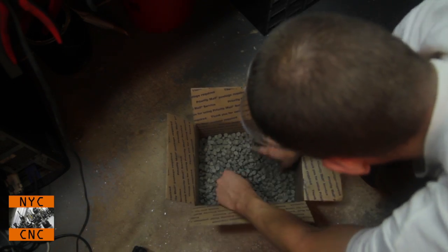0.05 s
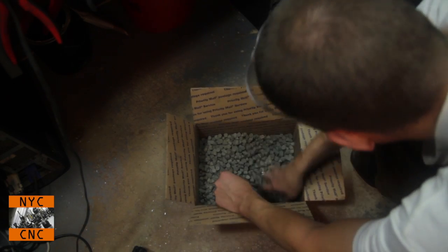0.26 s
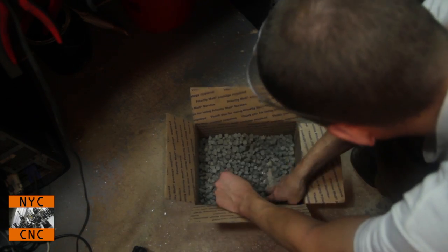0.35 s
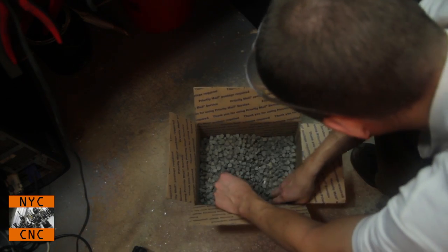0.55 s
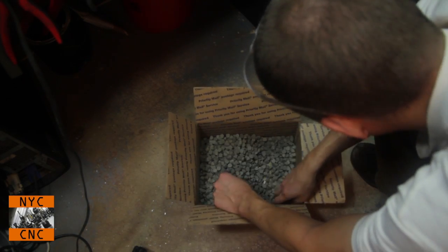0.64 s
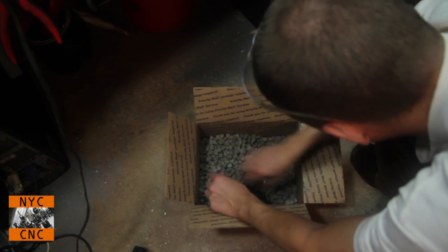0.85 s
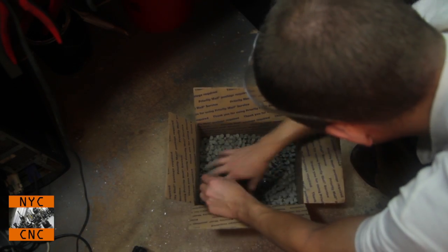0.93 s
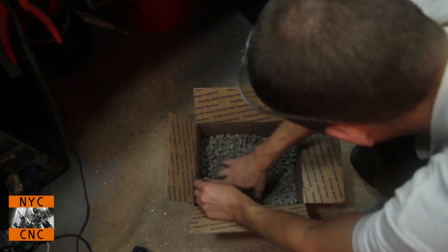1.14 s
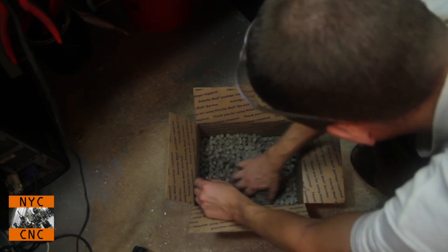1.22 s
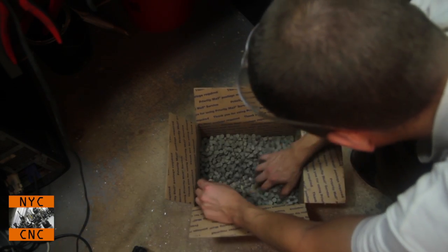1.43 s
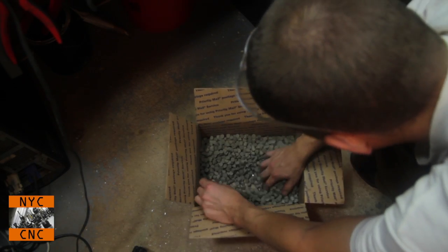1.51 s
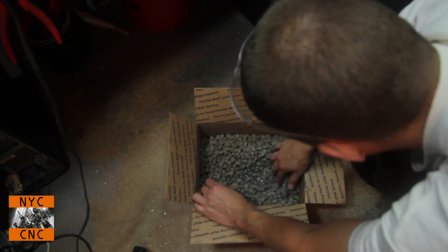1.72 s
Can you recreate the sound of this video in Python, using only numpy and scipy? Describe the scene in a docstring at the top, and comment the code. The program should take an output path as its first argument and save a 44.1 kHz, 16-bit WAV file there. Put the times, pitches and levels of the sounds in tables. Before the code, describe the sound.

Hands dig through a heap of small hard pellets in a cardboard box: a bright rattling rush with hollow knocks, a quieter lull, then another surge; close microphone in a workshop with slight echo.

```python
"""Hands digging through a box of metal pellets

Thousands of small pellets in a cardboard box tick in a bright hiss: random clicks exciting short rings.
The shifting heap clacks and drums on the cardboard, whose resonant modes answer with short hollow knocks.
Each knock also rattles pellets. A workshop adds echo and room tone; one close microphone feeds both channels."""
import sys
import numpy as np
from scipy import signal
from scipy.fft import rfft, irfft, next_fast_len
from scipy.io import wavfile

SR = 44100
rng = np.random.default_rng(int(sys.argv[2]) if len(sys.argv) > 2 else 0)


def persist_wave(psi):
    """Save psi, clipped to +-1, as 16-bit WAV."""
    counts = np.round(np.clip(psi, -1, 1) * 32767).astype(np.int16)
    wavfile.write(sys.argv[1], SR, np.atleast_2d(counts).T)


N = 77175


def amp(db):
    """Decibels to linear gain."""
    return 10 ** (np.asarray(db) / 20)


def rms_one(x):
    """Scale to rms 1."""
    return x / np.sqrt(np.mean(x ** 2) + 1e-20)


def in_time(rows):
    """Interpolate table columns at every sample; the first column is t/s."""
    s, *columns = np.transpose(rows)
    return [np.interp(np.arange(N) / SR, s, c) for c in columns]


def at_hz(points, hz):
    """Interpolate a spectrum in dB on a log frequency axis."""
    points_hz, points_db = np.array(points).T
    return np.interp(np.log(hz), np.log(points_hz), points_db)


def ring(clicks, hz, t60_s):
    """Two-pole resonator: a unit click starts a decaying sine of initial height 1."""
    r = amp(-60 / (t60_s * SR))
    w = 2 * np.pi * hz / SR
    return signal.lfilter([0, np.sin(w)], [1, -2 * r * np.cos(w), r * r], clicks + 1e-18)


def contacts(per_s, spread_db):
    """Random impacts: clicks of uneven size and either sign."""
    excess_db = spread_db * np.minimum(rng.exponential(1, N), 5)
    sizes = amp(excess_db) * rng.choice([-1, 1], N)
    return sizes * (rng.random(N) < per_s / SR)


def grains(per_s, spread_db, t60_cycles, colour, count=24):
    """Impacts of small hard bodies: clicks dealt at random to short rings across the colour's range; rms 1."""
    clicks = contacts(per_s, spread_db)
    dealt = rng.integers(0, count, N)
    out = 0
    for k, hz in enumerate(np.geomspace(colour[0][0], colour[-1][0], count)):
        gain = amp(at_hz(colour, hz)) * hz  # hz offsets band spacing and ring length: colour is per Hz
        out = out + gain * ring(clicks * (dealt == k), hz, t60_cycles / hz)
    return rms_one(out)


def noise(colour, level_db):
    """Steady Gaussian noise shaped by a spectrum."""
    hz = np.maximum(np.arange(N // 2 + 1) * SR / N, 1)
    spectrum = rfft(rng.standard_normal(N)) * amp(at_hz(colour, hz))
    return amp(level_db) * rms_one(irfft(spectrum, N))


def drift(corner_hz):
    """Slow random fluctuation: noise through two equal low-pass poles; rms 1."""
    r = np.exp(-2 * np.pi * corner_hz / SR)
    slow = signal.lfilter([1], [1, -2 * r, r * r], rng.standard_normal(N + 4000))
    return rms_one(slow[4000:])  # drop filter start-up


# stirring of the pellets: t/s, tick level/dB, clack level relative to ticks/dB
STIRRING = [(0.0, -42.5, 1), (0.028, -46, 6.5), (0.042, -39, 0.5), (0.106, -46, 0.5), (0.144, -34, -8.5),
            (0.184, -40, -16.5), (0.204, -31, -5), (0.3, -30.5, -4), (0.324, -30.5, 3.5), (0.34, -27, -6.5),
            (0.364, -25, 4), (0.49, -45.5, -1.5), (0.532, -43.5, 3.5), (0.596, -53, 0.2), (0.66, -45, -4),
            (0.762, -51.5, -1.5), (0.786, -42.5, -4), (0.816, -46, -8.5), (0.884, -45.5, -13),
            (0.96, -56, -4.5), (1.014, -57, -16.5), (1.026, -38, 8), (1.048, -34, 6), (1.088, -50.5, 9),
            (1.116, -41.5, -2.5), (1.214, -29.5, 4.5), (1.27, -29.5, -4), (1.42, -33.5, -1.5),
            (1.582, -41, -3), (1.745, -43, 3.5)]
# spectrum of the fine ticks: f/Hz, density/(dB per Hz)
TICK_COLOUR = [(2350, 4.5), (4000, -4), (6490, -3), (6920, -1.5), (8390, 3.5), (10300, 4), (13400, -0.5),
               (15600, -31.5)]
# spectrum of the heavier clacks: f/Hz, density/(dB per Hz)
CLACK_COLOUR = [(710, -2), (1200, -0.5), (1470, -11.5), (1810, 5.5), (2360, -8), (4500, -10.5), (5850, -80),
                (9900, -120)]
TICKS_PER_S, TICK_SPREAD_DB, TICK_T60_CYCLES = 36000, 2.0, 13.95
CLACKS_PER_S, CLACK_SPREAD_DB, CLACK_T60_CYCLES = 7000, 2, 5.67
CLUMP_RMS_DB, CLUMP_CORNER_HZ = 1.1, 35.0


def pellets():
    """Pellets slide in small uneven avalanches: dense ticks and coarser clacks follow the stirring."""
    level_db, clack_db = in_time(STIRRING)
    ticks = grains(TICKS_PER_S, TICK_SPREAD_DB, TICK_T60_CYCLES, TICK_COLOUR)
    clacks = grains(CLACKS_PER_S, CLACK_SPREAD_DB, CLACK_T60_CYCLES, CLACK_COLOUR)
    clump_db = CLUMP_RMS_DB * drift(CLUMP_CORNER_HZ)
    return amp(level_db + clump_db) * (ticks + amp(clack_db) * clacks)


REACH_OCT, FAR_DB = 0.473, -11  # Gaussian width of a blow's reach; floor for far modes


def reach(hz, centre_hz):
    """A blow excites modes near its centre most, the far ones down to a floor."""
    octaves = np.log2(hz / centre_hz)
    return amp(FAR_DB) + np.exp(-.5 * (octaves / REACH_OCT) ** 2)


# heap pressing on the cardboard: t/s, level/dB, centre of ringing walls f/Hz, bottom-panel weight/dB
DRUMMING = [(0.0, -32, 462, -7), (0.028, -38, 520, -3), (0.072, -33, 585.5, -4), (0.102, -49.5, 690, -19),
            (0.14, -35, 717, -7.5), (0.188, -35.5, 445, -17.5), (0.212, -38, 413, -4.5),
            (0.28, -32, 542, -6), (0.314, -32.5, 457, -4.5), (0.358, -22, 700, 1.5), (0.46, -37, 740, -20),
            (0.528, -38.5, 447, -18), (0.544, -46.5, 450, -16.5), (0.602, -46.5, 690, -24.5),
            (0.66, -43, 572, -19), (0.704, -44.5, 674, -21.5), (0.766, -38, 577, -16), (0.8, -35, 700, -16),
            (0.868, -41.5, 730, -16.5), (0.908, -42.5, 740, -4.5), (0.956, -57, 500, -15),
            (1.02, -54, 345, -12), (1.032, -30.5, 560, 4), (1.068, -34, 440, 1.5),
            (1.112, -36.5, 390, -9.5), (1.194, -30, 494, -5.5), (1.232, -25, 518, -7),
            (1.276, -29.5, 400, -1.5), (1.32, -26.5, 500, -17), (1.412, -22, 740, -27),
            (1.465, -29, 460, -18), (1.51, -37, 500, -13.5), (1.564, -34.5, 422, -13),
            (1.602, -42.5, 518, -22.5), (1.646, -35.5, 390, -10.5), (1.674, -38, 379, -17.5),
            (1.718, -37, 424, -14), (1.745, -32.5, 420, -9.5)]
# cardboard box modes: f/Hz, relative level/dB, t60/s
BOX_MODES = [(65, -4, 0.064), (103.4, -2.5, 0.05), (221, -23, 0.045), (271.43, -3, 0.203), (330, 7, 0.0258),
             (410.7, -1.5, 0.041), (539.25, 2, 0.0516), (606, -3.5, 0.0318), (700, 3, 0.0188),
             (780, -4, 0.0333), (905, 4.5, 0.0365), (1010, 1.5, 0.0396), (1210.8, 8.5, 0.0359),
             (1459.4, 0.5, 0.05), (1681, 1.5, 0.0364), (1800, 3, 0.047), (2190, 0, 0.0142)]
DRUM_PER_S, DRUM_SPREAD_DB = 1500, 1
BOTTOM_HZ, BOTTOM_DB = 230, 8  # modes below this are the bottom panel; gain on its weight


def drumming():
    """Many small blows on the cardboard, each ringing the modes in its own random mix."""
    level_db, centre_hz, bottom_db = in_time(DRUMMING)
    blows = contacts(DRUM_PER_S, DRUM_SPREAD_DB)
    power = sum(amp(2 * db) * t60_s * reach(hz, centre_hz) ** 2 for hz, db, t60_s in BOX_MODES)
    out = 0
    for hz, db, t60_s in BOX_MODES:
        if hz < BOTTOM_HZ:
            share = amp(BOTTOM_DB + bottom_db) * np.sqrt(power.mean())
        else:
            share = reach(hz, centre_hz)
        gain = amp(db) * share / np.sqrt(power)  # evens out loudness as the centre moves
        out = out + ring(blows * rng.standard_normal(N) * gain, hz, t60_s)
    return amp(level_db) * rms_one(out)


# single knocks on the box: t/s, swing envelope peak/dB, f/Hz, time to peak/ms
KNOCKS_ON_BOX = [(.033, -26, 950, 2.1), (.06, -26.5, 404.7, 2.17), (.083, -32, 923, 2.75),
                 (.137, -33.5, 1051, 5.3), (.222, -28, 385, 4.1), (.324, -18, 318, 1.56),
                 (.331, -15.5, 413, 1.48), (.337, -16.5, 330, 1.78), (.357, -19.5, 625.4, 4.1),
                 (.364, -15.5, 223.5, 2.69), (.3645, -11, 720, 1.3), (.3682, -6, 700, 1.8),
                 (.378, -15, 578, 1.88), (.389, -16, 720, 3.34), (.457, -27, 750, 1.6),
                 (.484, -29, 750, 1.3), (.526, -31, 380, 3.3), (.603, -33, 1400, .6),
                 (.716, -33, 700, 1.55), (.7255, -23, 700, 1.64), (.7435, -23.5, 700, 0.84),
                 (.749, -30, 430, 3.1), (.777, -22.5, 620, 2.2), (.792, -30, 800, 4.1), (.832, -32, 750, 2),
                 (.87, -28, 818, 1.29), (.976, -46, 780, 3.1), (1.0245, -17, 360, 2.2),
                 (1.042, -23, 1800, 2.5), (1.044, -25, 820, 2.5), (1.127, -23, 450, 1.2),
                 (1.197, -22, 1800, 2.5), (1.197, -24, 457, 2.6), (1.24, -20, 680, 2),
                 (1.371, -15, 780, 1.1), (1.39, -22, 481, 1.1), (1.405, -18, 412, 3.2),
                 (1.41, -19.5, 913, 3.3), (1.438, -17, 412, 6.06), (1.465, -24, 564, 2.57),
                 (1.51, -28.5, 514, 2.24), (1.559, -31.5, 397.7, 5.5), (1.6495, -21.5, 375, 3.1),
                 (1.655, -28, 950, 2.2), (1.668, -28, 401, 2.5), (1.7465, -23, 320, 1.2)]
RING_DB, TAP_DB = -24, -21  # drive of the modes by the swing; hard tap re knock peak


def knocks():
    """The loaded panel swings a few cycles at its own pitch; this and a hard tap ring the box modes."""
    t = np.arange(2000) / SR
    swing, taps = np.zeros(N + len(t)), np.zeros(N)
    for s, peak_db, pitch_hz, rise_ms in KNOCKS_ON_BOX:
        i = int(s * SR)
        u = t / (np.clip(rise_ms, .5, 8) / 1000)
        envelope = u * np.exp(1 - u)  # peaks at 1 when u = 1
        swing[i:i + len(t)] += amp(peak_db) * envelope * np.sin(2 * np.pi * pitch_hz * t)
        taps[i] = amp(peak_db + TAP_DB)
    swing = swing[:N]
    box = 0
    for hz, db, t60_s in BOX_MODES:
        if hz > BOTTOM_HZ:
            drive = amp(RING_DB) * swing * hz / SR + taps * rng.standard_normal(N)
            box = box + amp(db) * ring(drive, hz, t60_s)
    return swing + box


RATTLE_DB, RATTLE_DECAY_S = -25.5, 0.0151  # level re knock peak; 1/e time
RATTLES_PER_S, RATTLE_SPREAD_DB, RATTLE_T60_CYCLES = 3300, 2.77, 6.5


def rattle():
    """Each knock shakes pellets, whose clacks die away exponentially."""
    starts = np.zeros(N)
    for s, peak_db, *_ in KNOCKS_ON_BOX:
        starts[int(s * SR)] = amp(peak_db + RATTLE_DB)
    pole = np.exp(-1 / (RATTLE_DECAY_S * SR))
    shake = signal.lfilter([1], [1, -pole], starts + 1e-18)
    return shake * grains(RATTLES_PER_S, RATTLE_SPREAD_DB, RATTLE_T60_CYCLES, CLACK_COLOUR)


ROOM_T60_S, ROOM_DB, WALL_CUT_HZ = 0.288, -19, 2090  # T60 before the walls' treble loss


def workshop(x):
    """Room echo: ten feedback delays of alternating sign, duller on every round."""
    size = next_fast_len(N + SR)
    w = 2 * np.pi * np.arange(size // 2 + 1) / size
    wall = 1 / (1 + 1j * w * SR / (2 * np.pi * WALL_CUT_HZ))
    response = 0
    for k, lag in enumerate(rng.uniform(.012, .04, 10) * SR):
        loop = amp(-60 * lag / SR / ROOM_T60_S) * np.exp(-1j * w * lag) * wall
        response = response + (-1) ** k * loop / (1 - loop)
    return irfft(rfft(x, size) * response, size)[:N]


# room tone spectrum: f/Hz, density/(dB per Hz)
TONE_COLOUR = [(15, -32.5), (25, -14.5), (69, -4.5), (135, -27), (769, -14), (4380, -23.5), (10300, 2.5),
               (15000, 0.5)]
TONE_DB = -59.5


def room_tone():
    """Steady coloured noise of the workshop."""
    return noise(TONE_COLOUR, TONE_DB)


# electronics noise spectrum: f/Hz, density/(dB per Hz)
SELF_COLOUR = [(25, 5), (100, -21), (1000, -46), (15000, -51)]
SELF_DB = -64


def self_noise():
    """Faint noise of one channel's electronics."""
    return noise(SELF_COLOUR, SELF_DB)


MIC_LOW_HZ = 162.8


def scene():
    """Box and pellets in the room, high-passed by the microphone, over room tone; both channels alike."""
    near = pellets() + drumming() + knocks() + rattle()
    mono = near + amp(ROOM_DB) * workshop(near)
    low_cut = signal.butter(2, MIC_LOW_HZ, "high", fs=SR, output="sos")
    mono = signal.sosfilt(low_cut, mono) + room_tone()
    return np.array([mono, mono])


CUTOFF_HZ, OFFSET = 15880, -.0024  # steep low-pass edge; constant shift, full scale = 1


def record(dry):
    """Add independent noise per channel, cut the top steeply, shift by a small constant."""
    wet = dry + [self_noise() for _ in dry]
    top_cut = signal.ellip(20, .5, 100, CUTOFF_HZ, fs=SR, output="sos")
    return signal.sosfilt(top_cut, wet) + OFFSET


dry = scene()
out = record(dry)
persist_wave(out)
```